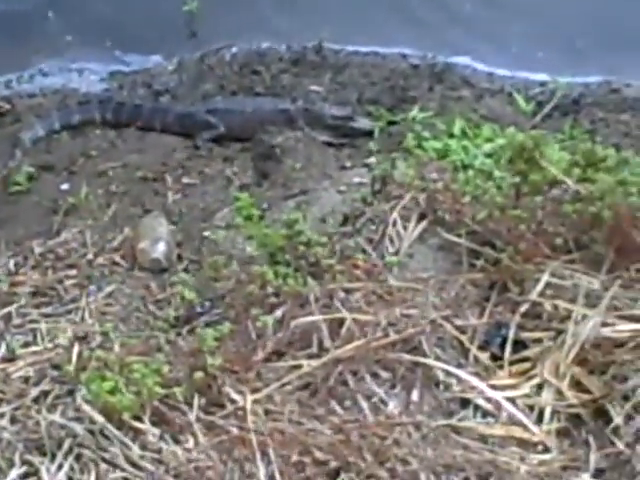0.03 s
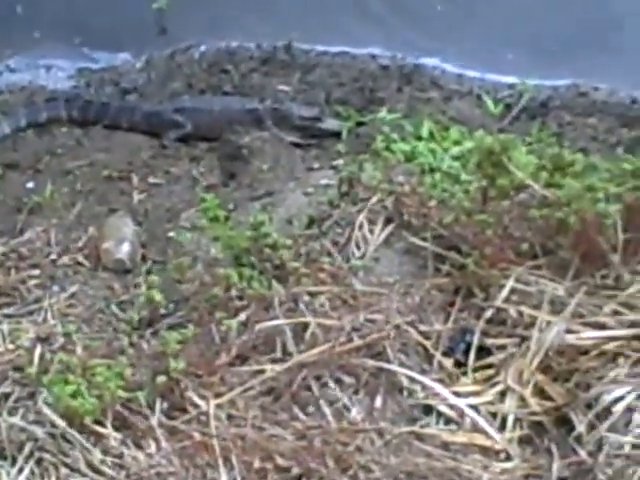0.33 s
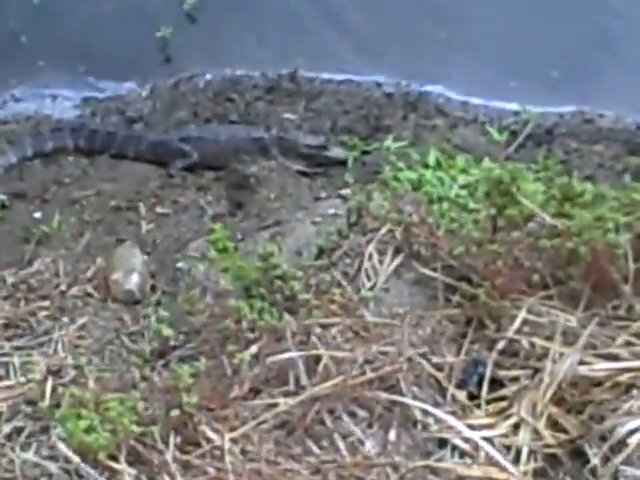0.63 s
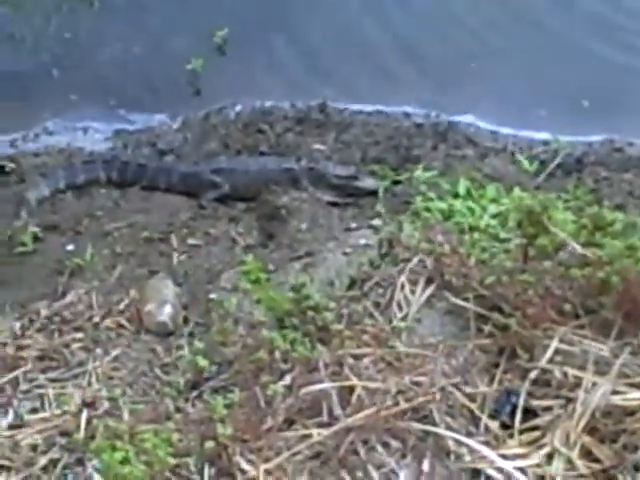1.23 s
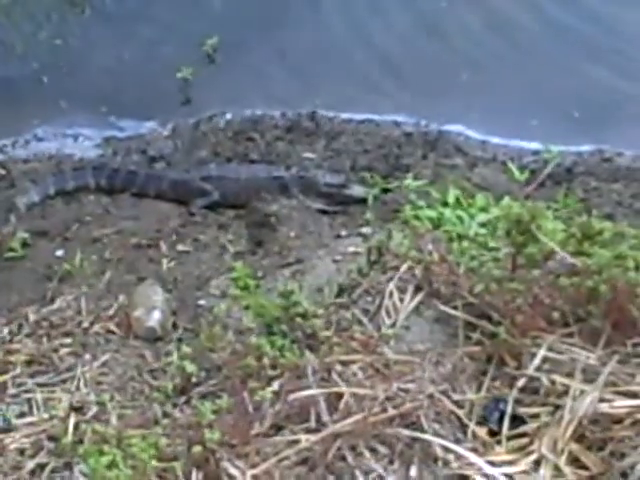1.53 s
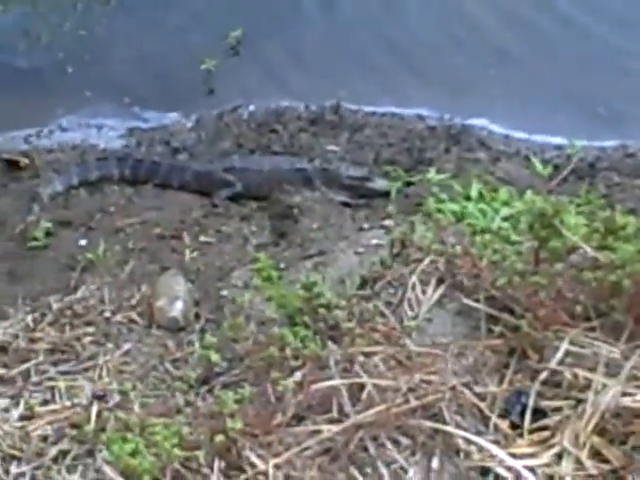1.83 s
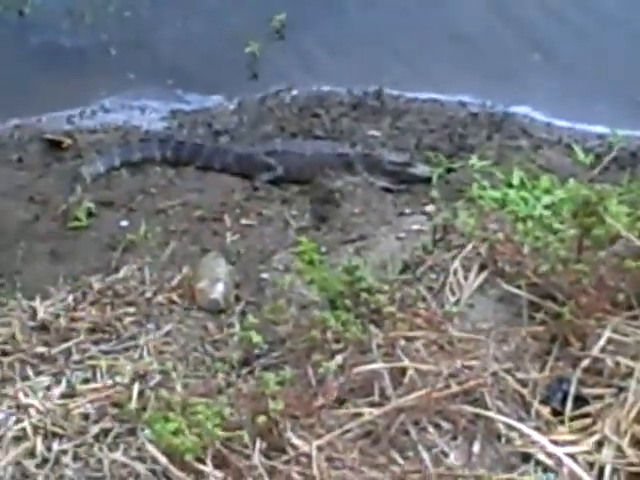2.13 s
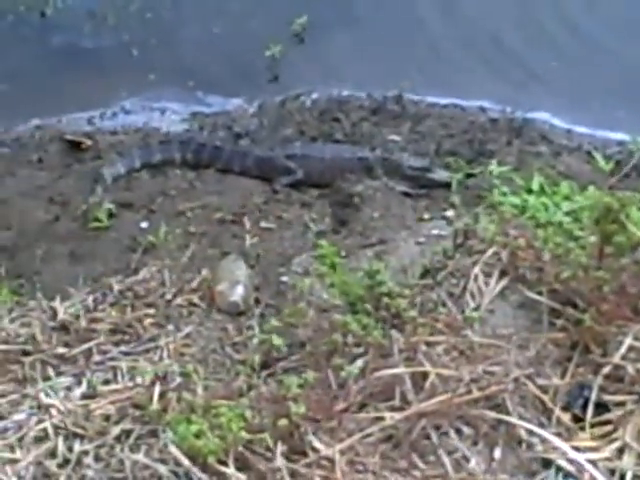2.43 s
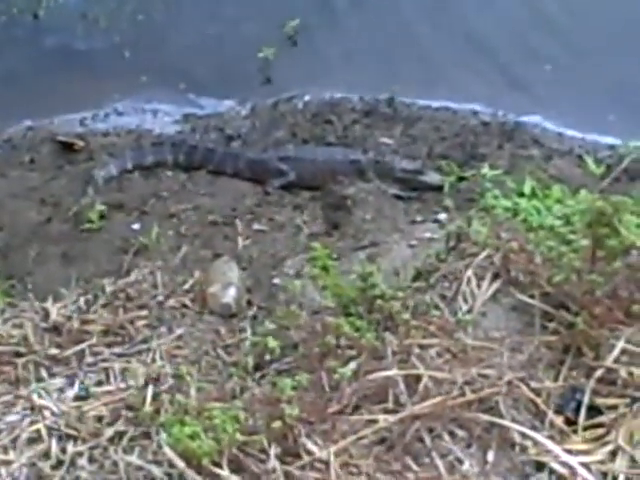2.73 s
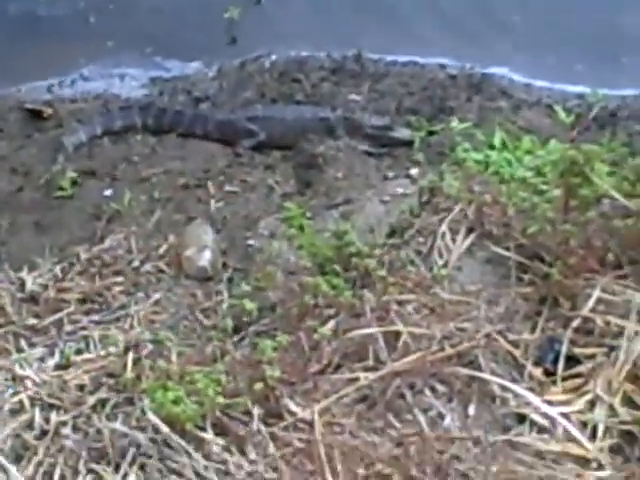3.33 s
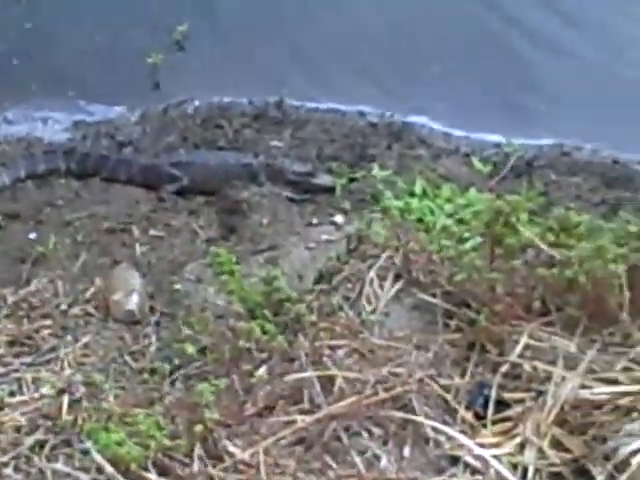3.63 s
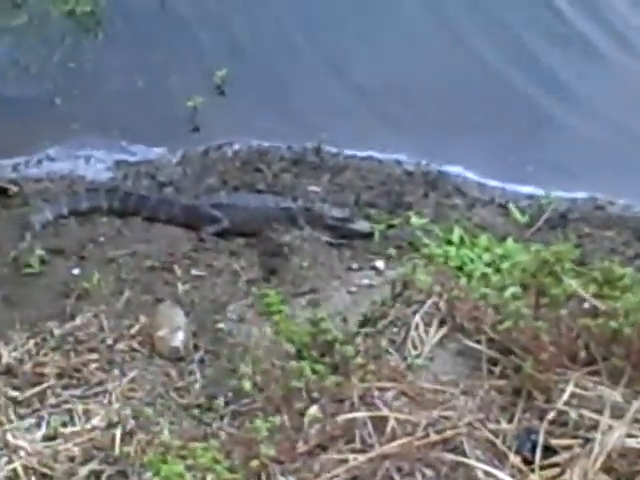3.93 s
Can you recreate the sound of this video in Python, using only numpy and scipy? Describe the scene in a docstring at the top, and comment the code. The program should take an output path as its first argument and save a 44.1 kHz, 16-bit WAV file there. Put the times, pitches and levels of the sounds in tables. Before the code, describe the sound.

A steady high insect chorus outdoors, with low wind buffeting, distant chirps and a brief dry rustle.

```python
"""A steady chorus of insects scrapes its wings on a muddy bank beside still water.
The far ones blur into a hiss, while a few nearer ones each trill on one pitch.
A far bird whistles thin falling chirps, and dry stalks rustle and snap, mostly near the end.
Wind buffets the microphone, hardest in the first two seconds.
Behind it all are a faint far call, a soft wash of open air and a hum like a distant motor."""
import sys
import numpy as np
from scipy import signal
from scipy.fft import rfft, irfft
from scipy.io import wavfile
from scipy.ndimage import uniform_filter1d

SR = 44100
rng = np.random.default_rng(int(sys.argv[2]) if len(sys.argv) > 2 else 0)


def wav_out(sig):
    """Save sig, one row per channel (or a flat mono array), as 16-bit PCM at SR to the path in sys.argv[1]."""
    wavfile.write(sys.argv[1], SR, np.round(np.clip(np.atleast_2d(sig).T, -1, 1) * 32767).astype(np.int16))


N = 176400  # 4 seconds
TIME = np.arange(N) / SR


def amp(db):
    """Turns decibels into a number to multiply by."""
    return 10 ** (np.asarray(db) / 20)


def unit(x):
    """Scales a sound to an average strength (rms) of 1."""
    return x / np.sqrt(np.mean(abs(x) ** 2) + 1e-20)


def curve(points, t=TIME):
    """Joins points in time with straight lines."""
    return np.interp(t, *np.transpose(points))


def bell(x, centre, width):
    """A smooth bump, 1 at its centre."""
    return np.exp(-2 * ((x - centre) / width) ** 2)


def tone_gain(points, hz):
    """Looks up how strong a frequency is in a tone table."""
    f, db = np.transpose(points)
    return amp(np.interp(np.log(hz + 1), np.log(f + 1), db))


def colour(x, points):
    """Filters a sound by a tone table, to strength 1."""
    return unit(irfft(rfft(x) * tone_gain(points, np.fft.rfftfreq(N, 1 / SR)), N))


def band(hz, width_hz):
    """Noise around one pitch, at strength 1."""
    f = np.fft.rfftfreq(N, 1 / SR)
    return unit(irfft(rfft(rng.standard_normal(N)) * bell(f, hz, width_hz), N))


def drift(rate_hz):
    """Smooth random wandering, at strength 1."""
    return band(0, 2 * rate_hz)


def sine(hz):
    """A pure wave that follows a changing frequency."""
    return np.sin(2 * np.pi * np.cumsum(hz) / SR)


def steadied(x, samples):
    """Evens out the loudness of a noise over this many samples."""
    power = uniform_filter1d(abs(signal.hilbert(x)) ** 2 / 2, samples)
    return x / np.sqrt(abs(power) + 1e-3)


def wings(hz, width_hz, pulses_per_s=37, depth=0.12):
    """A wing rings as it is scraped in quick, uneven pulses."""
    pulse_rate = pulses_per_s * (1 + 0.3 * rng.standard_normal() + 0.17 * drift(3.9))
    ring = steadied(band(hz, width_hz), samples=1400)
    return unit(ring * (1 + depth * sine(pulse_rate)))


# The tone of the far insects. Each row: frequency in Hz, relative level in dB.
CHORUS_TONE = [(2000, -39.5), (3200, -15), (3900, -8.5), (4400, -4.5), (4800, -2), (5500, -1.5), (5900, 1),
               (6300, 2), (6700, 1), (6950, -2.5), (7400, -4.5), (7900, -11.5), (8400, -17.5), (9000, -47)]
# How loud their hiss is. Each row: time in seconds, level in dB.
CHORUS_LEVELS = [(0, -49), (1, -50), (2, -49.5), (3, -49.5), (4, -48.5)]
# Nearer insects. Each row: start and length in seconds, pitch and width in Hz, level in dB.
NEAR_TRILLS = [(0.01, 1, 6800, 96, -61), (.03, 1.2, 4970, 27, -61), (0.096, 0.66, 4755, 25, -54.5),
               (0.08, 0.22, 5350, 19, -59), (.11, 0.34, 4420, 19, -62.5), (.26, 0.5, 4970, 20, -57),
               (0.33, 0.32, 4700, 310, -61), (-0.3, .31, 5412, 26, -59), (0.738, 0.72, 4760, 26, -59.5),
               (0.938, 1.52, 6580, 100, -58), (1.54, .76, 5890, 47, -57.5), (2.195, 0.48, 7630, 900, -60),
               (2.24, 0.27, 5080, 14.5, -55), (2.274, 1.15, 4410, 18, -63.5), (2.6, 0.85, 6500, 71, -54.5),
               (2.66, .6, 5100, 90, -58), (2.88, 0.7, 4860, 380, -58)]

def insects(far_trills_db=-55.5):
    """Countless far insects merge into a hiss, and single trills swell out of it."""
    out = amp(curve(CHORUS_LEVELS) + 0.64 * drift(40)) * colour(rng.standard_normal(N), CHORUS_TONE)
    far_trills = sum(band(hz + 25 * rng.standard_normal(), 18) * tone_gain(CHORUS_TONE, hz)
                     for hz in np.linspace(4100, 7200, 20))
    for start, length, hz, width, db in NEAR_TRILLS:
        progress = np.clip((TIME - start) / length, 0, 1)
        swell = np.sqrt(abs(np.sin(np.pi * progress)))
        out += amp(db) * swell * wings(hz, width)
    return out + amp(far_trills_db) * unit(far_trills)


# The bird's calls. Each row: start and length in seconds, starting pitch in Hz, level in dB.
BIRD_CHIRPS = [(.412, 0.091, 3140, -59.5), (1.46, .08, 3340, -60.5), (2.78, 0.071, 4030, -60),
               (3.026, .09, 3330, -54.5), (3.915, 0.098, 3230, -56.5)]

def bird(fall=0.16, slur_db=-4.5, echo_db=-6.5, echo_rise_s=0.035, echo_decay_s=0.043):
    """Falling whistles end in a lower, rough slur and echo back from the banks."""
    out = np.zeros(N)
    for start, length, hz, db in BIRD_CHIRPS:
        progress = np.clip((TIME - start) / length, 0, 1)
        pitch = hz * (1 - fall * (1 - (1 - progress) ** 1.4) + .008 * drift(150))
        swell = abs(np.sin(np.pi * progress ** 1.16)) ** 0.44
        out += amp(db + 3.6 * drift(60)) * swell * sine(pitch)
        slur = bell(TIME, start + length + 0.024, .04) * band(hz * 0.815, width_hz=280)
        out += amp(db + slur_db) * slur
    echo = rng.standard_normal(N) * np.minimum(TIME / echo_rise_s, 1) ** 2 * np.exp(-TIME / echo_decay_s)
    return out + amp(echo_db) * signal.fftconvolve(out, echo / np.linalg.norm(echo))[:N]


# The tone of dry straw. Each row: frequency in Hz, relative level in dB.
STRAW_TONE = [(300, -26.5), (1000, -2), (1500, -6), (2700, -3), (4500, -7), (6300, 5.5), (7300, 3),
              (8200, -11), (9000, -23.5)]
# How loud the rustle is. Each row: time in seconds, level in dB.
RUSTLE_LEVELS = [(0, -80), (3.4, -71.5), (3.56, -54), (3.64, -55.5), (3.76, -48), (3.83, -75), (3.94, -60),
                 (4, -49)]
# Stalks snapping. Each row: start and fade time in seconds, level in dB, pitch in Hz,
# share of broad crack from 0 to 1.
STALK_SNAPS = [(0.898, .0015, -42, 6700, .1), (2.102, 0.0084, -42.5, 7450, 0.08),
               (2.108, 0.0051, -48, 6230, .05), (3.472, 0.0013, -35.5, 6500, .6),
               (3.592, .0012, -42, 6200, .8), (3.626, .0012, -39, 7100, 0.7),
               (3.632, 0.0013, -35.5, 6400, 0.5), (3.650, 0.0049, -40, 6240, .2),
               (3.672, 0.0014, -37, 6250, .2), (3.722, 0.0027, -42, 7400, 0.4),
               (3.790, 0.0011, -39.5, 6700, 0.76), (3.796, 0.0013, -35.5, 6550, 0.06),
               (3.979, 0.022, -40, 6600, 0.22)]

def stalks(ticks_per_s=1500):
    """Dry straw crackles with tiny ticks and gives a few clear snaps."""
    ticks = rng.standard_normal(N) * (rng.random(N) < ticks_per_s / SR)
    out = amp(curve(RUSTLE_LEVELS)) * colour(ticks, STRAW_TONE)
    crack = colour(rng.standard_normal(N), STRAW_TONE)
    for start, fade, db, hz, share in STALK_SNAPS:
        age = np.maximum(TIME - start, 0) / fade
        burst = np.sqrt(2 * age) * np.exp(.5 - age)  # jumps to 1, then dies away
        ring = steadied(band(hz, width_hz=990), samples=130)
        out += amp(db) * burst * ((1 - share) * ring + share * crack)
    return out


# The wind's strength. Each row: time in seconds, level in dB before boost_db is added.
WIND_LEVELS = [(0.0, -33.5), (0.1, -26), (0.13, -31.5), (0.78, -28.5), (0.81, -38), (0.86, -24), (1.0, -34),
               (1.19, -25), (1.21, -31), (1.26, -23.5), (1.65, -28), (1.73, -34), (1.85, -28), (1.88, -34),
               (1.96, -29), (1.99, -39.5), (2.6, -33.5), (2.62, -32), (2.88, -40), (3.33, -37),
               (3.82, -39.5), (3.85, -30.5), (3.95, -36), (4.0, -31.5)]
# The tone of its rumble. Each row: frequency in Hz at reference_db, relative level in dB.
RUMBLE_TONE = [(5, -6.5), (18, 3), (32, 2), (55, -8), (90, -9), (140, -25.5), (220, -31), (400, -39),
               (900, -71.5), (3000, -100)]

def wind_rumble(boost_db=2.5, reference_db=-27, octaves_per_db=.035):
    """Air swirls at the microphone and sounds brighter as it blows harder."""
    frames = dict(nperseg=4096, noverlap=3072)
    hz, times, spectrum = signal.stft(rng.standard_normal(N), SR, **frames)
    stretch = 2 ** (octaves_per_db * (curve(WIND_LEVELS, times) - reference_db))
    spectrum *= tone_gain(RUMBLE_TONE, hz[:, None] / stretch)
    rumble = unit(signal.istft(spectrum, **frames)[1][:N])
    return steadied(rumble, samples=4000) * amp(curve(WIND_LEVELS) + boost_db)


# Sharp puffs of wind. Each row: peak time and length in seconds, level in dB.
PUFFS = [(0.098, 0.051, -33), (.60, 0.038, -32), (0.66, 0.034, -25), (0.884, 0.056, -31),
         (1.184, 0.018, -17), (1.275, 0.096, -30.5), (1.39, 0.016, -22), (1.456, 0.038, -20.5),
         (1.573, 0.088, -26), (1.626, 0.0078, -22), (1.942, 0.018, -24.5), (2.718, 0.027, -32)]
# Their tone. Each row: frequency in Hz, relative level in dB.
PUFF_TONE = [(20, -10), (60, 3), (120, 0), (190, -8), (290, -22), (450, -37), (750, -45), (1300, -55.5),
             (3000, -78)]

def wind_puffs():
    """Short puffs hit the microphone with low thumps."""
    loudness = sum(amp(db) * bell(TIME, peak, length) for peak, length, db in PUFFS)
    return loudness * steadied(colour(rng.standard_normal(N), PUFF_TONE), samples=1200)


# Soft swells of noise. Each row: peak time and length in seconds, level in dB, pitch and width in Hz.
NOISE_SWELLS = [(0.277, 0.063, -51, 520, 348), (0.434, .1, -55.5, 426, 200), (0.874, .4, -66, 1590, 198),
                (1.183, 0.17, -50.5, 520, 332), (1.562, 0.046, -56, 686, 400),
                (2.85, 0.29, -64.5, 1590, 200), (3.646, 0.15, -59, 1530, 698)]

def soft_swells():
    """Low rushes of air, a faint far call near 1600 Hz, and a midrange rustle of stalks near the end."""
    return sum(amp(db) * bell(TIME, peak, length) * band(hz, width)
               for peak, length, db, hz, width in NOISE_SWELLS)


# The notes in the hum. Each row: pitch in Hz, level in dB.
MOTOR_NOTES = [(120, -42.5), (180, -62), (264, -60), (352, -62.5)]

def motor(waver_hz=0.58):
    """A far motor hums, wavering a little in loudness and pitch."""
    return sum(amp(db + drift(3)) * unit(sine(hz + waver_hz * drift(4.6))) for hz, db in MOTOR_NOTES)


# The tone of the outdoors. Each row: frequency in Hz, relative level in dB.
AIR_TONE = [(20, 0.5), (110, -0.5), (170, -6.5), (250, -17), (400, -19), (850, -20), (1100, -25),
            (1550, -27.5), (1900, -29.5), (3000, -30.5), (6000, -31), (9000, -51)]
# Its slow swell. Each row: time in seconds, change of level in dB.
AIR_CHANGES = [(0, 0), (1.2, 0.5), (2.6, 0.86), (4, -0.5)]

def open_air(level_db=-44):
    """A soft wash of outdoor noise gently rises and falls."""
    loudness = amp(level_db + curve(AIR_CHANGES) + .5 * drift(3.3))
    return loudness * colour(rng.standard_normal(N), AIR_TONE)


def scene():
    """Adds up all the sounds at one microphone."""
    wind = wind_rumble() + wind_puffs()
    background = soft_swells() + motor() + open_air()
    return (insects() + bird() + stalks() + wind + background)[None]


def record(dry):
    """The recorder cuts off the treble above 9000 Hz."""
    low_pass = signal.firwin(401, 9000, window=("kaiser", 9), fs=SR)
    return signal.oaconvolve(dry, low_pass[None], "same")


dry = scene()
out = record(dry)
wav_out(out)
```